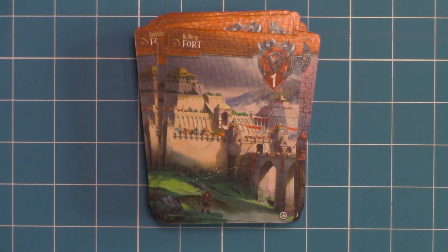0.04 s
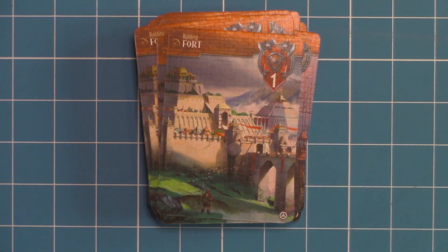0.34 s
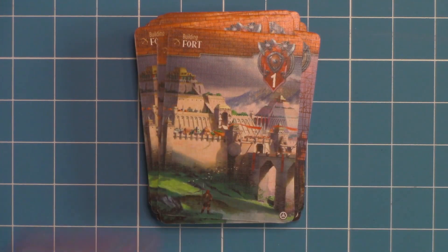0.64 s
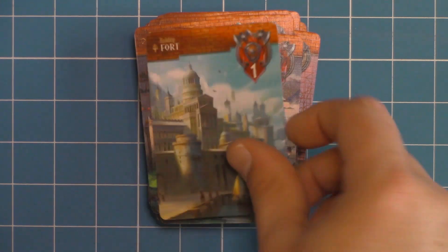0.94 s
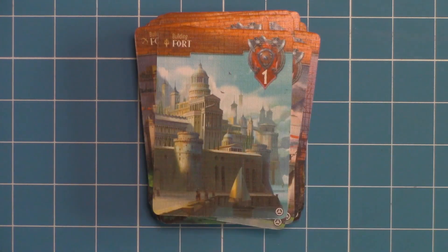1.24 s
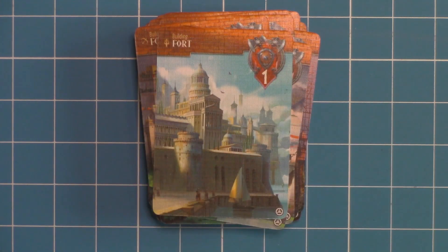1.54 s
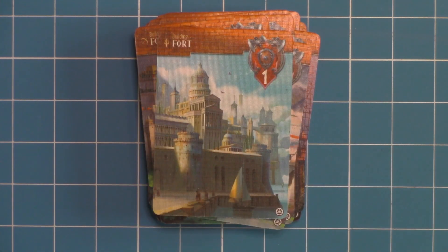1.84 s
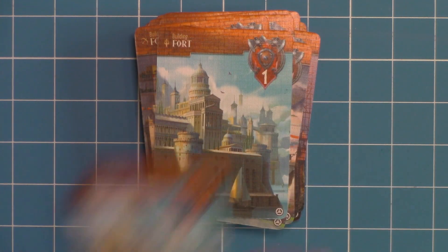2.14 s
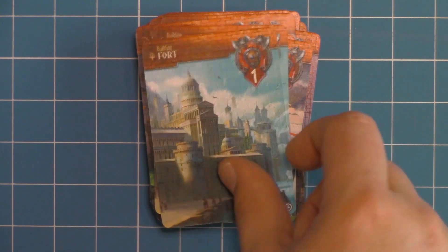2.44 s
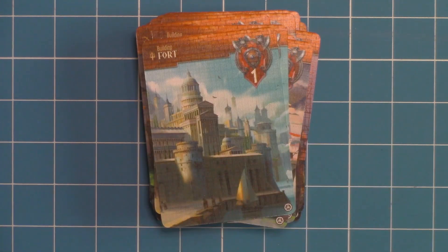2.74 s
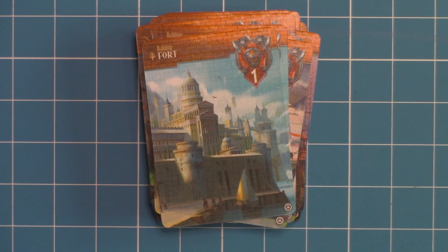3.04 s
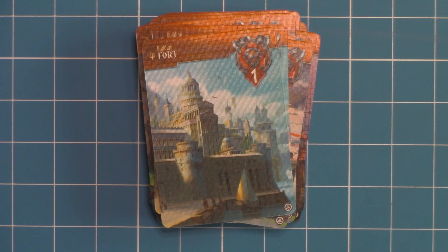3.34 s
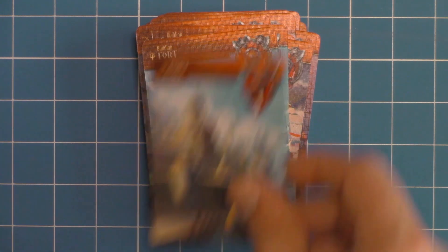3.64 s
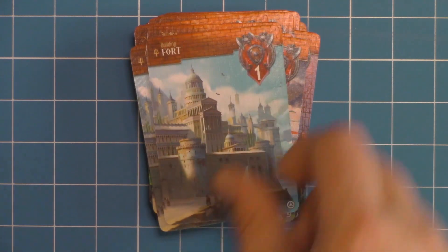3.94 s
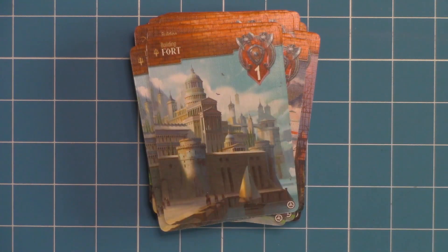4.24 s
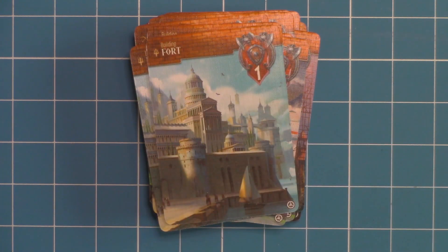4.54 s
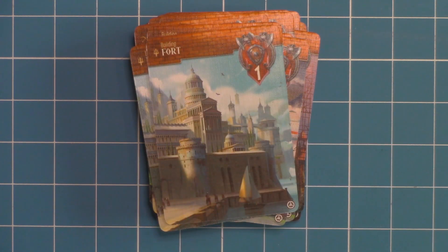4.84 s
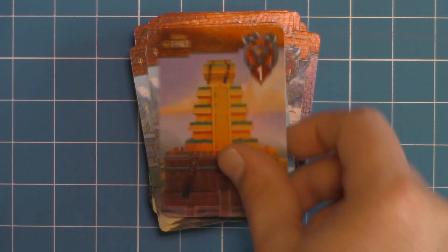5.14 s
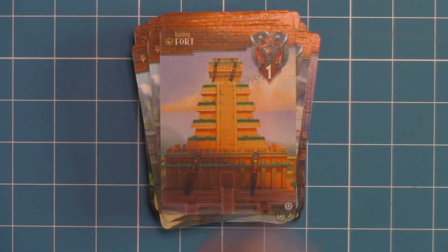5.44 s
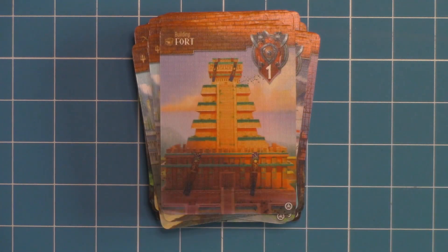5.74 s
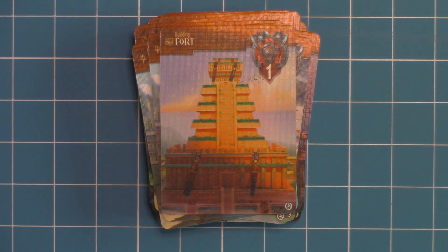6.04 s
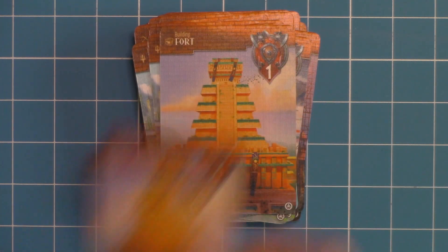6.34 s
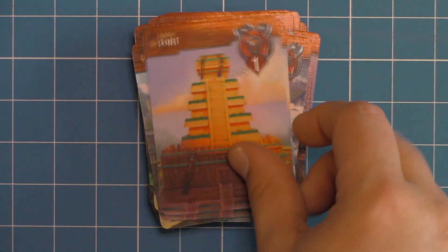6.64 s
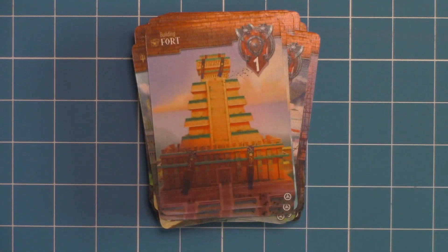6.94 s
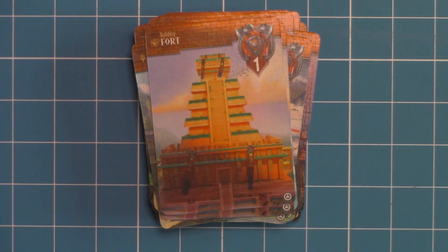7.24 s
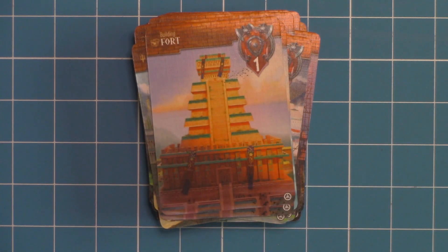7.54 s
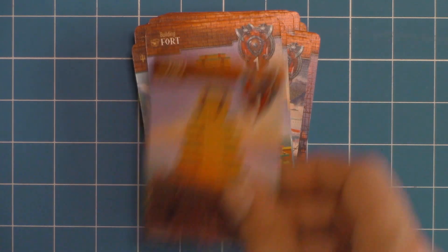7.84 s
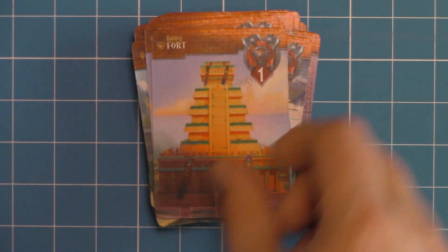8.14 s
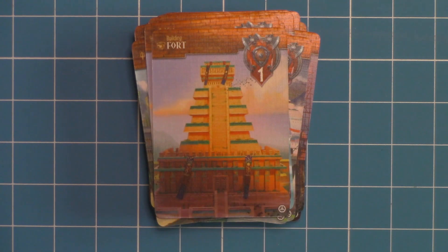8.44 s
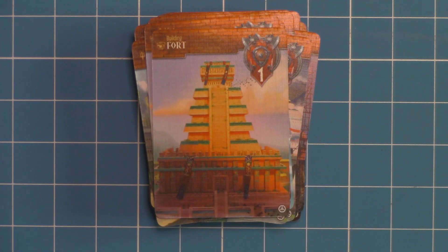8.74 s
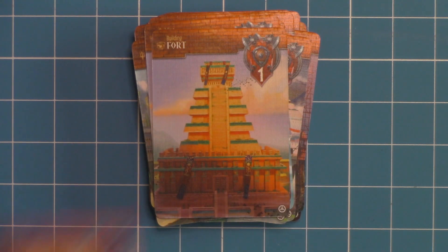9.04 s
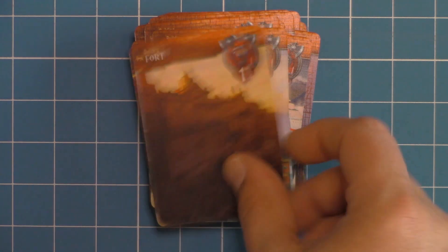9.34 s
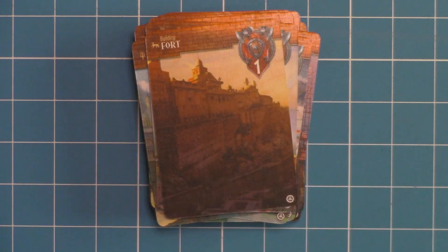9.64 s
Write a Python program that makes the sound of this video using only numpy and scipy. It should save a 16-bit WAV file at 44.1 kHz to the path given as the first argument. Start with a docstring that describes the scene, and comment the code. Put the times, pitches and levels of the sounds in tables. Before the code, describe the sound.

In a small room with a faint rumble and hum, someone deals stiff cards close to the microphone at a steady, unhurried pace. A finger softly brushes the deck, then a card rubs free with a grainy swish, a brief chirp and a crisp snap. It lands on a pile with a tick and a sharp slap that makes the table boom briefly. This happens seven times.

```python
"""Over the faint rumble and hum of a small room, a finger brushes a deck of stiff cards close by.
Seven cards are drawn, one at a time, and laid on a pile on a table. Each rubs off the deck with a swish
and a short rising chirp; all but the last end in a flick of the edge. Each then ticks against the pile,
skims over it and slaps flat under the thumb, which sets the table booming. Walls add a short echo."""
import sys
import numpy as np
from scipy import signal
from scipy.fft import rfft, irfft, next_fast_len
from scipy.io import wavfile
from scipy.ndimage import uniform_filter1d

SR = 44100
rng = np.random.default_rng(int(sys.argv[2]) if len(sys.argv) > 2 else 0)


def to_wav(s):
    """Save 16-bit WAV."""
    ch = np.atleast_2d(s).T  # columns
    pcm = np.round(np.clip(ch, -1, 1) * 32767)  # PCM
    wavfile.write(sys.argv[1], SR, pcm.astype(np.int16))


N = 432180
TIME = np.arange(N) / SR

# Tone colour of light rubbing on a card's face: pitch_hz, level_db
RUB_COLOUR = [(400, -7), (1000, -8), (2100, 3), (3200, -1), (4300, 0.5), (5300, 7), (6400, -4.5),
              (8200, -8.5), (13000, -15), (16000, -29)]
# Tone colour of the fine hiss of card on card: pitch_hz, level_db
HISS_COLOUR = [(5000, -21), (8500, -8), (10500, -1.5), (13000, 0), (14500, -7), (16000, -19)]
# Tone colour of a card edge's tick: pitch_hz, level_db
TICK_COLOUR = [(300, -11), (1000, 1), (2100, 1), (3300, -0.5), (5400, 2.5), (6800, -5.5), (9000, -19),
               (13000, -15), (16000, -38)]
# Each card landing on the pile: slap_s, skim_length_s, skim_db, slap_db, ring_db, ring_hz, hiss_db,
# settle_db, puff_db, thumb_contact_ms (ring_db, hiss_db and settle_db are relative to the slap)
LANDINGS = [(0.9489, 0.14, -57, -21, -6, 5750, -10.5, -26, -58, 3.2),
            (2.3386, 0.13, -51, -17, 3.5, 5950, -11, -26, -54, 2.9),
            (3.7290, 0.11, -52.5, -18.5, -16, 5450, -7, -17.5, -50, 0.53),
            (5.1410, 0.08, -51, -25, -2, 5600, -9, -18, -60, 3.4),
            (6.5747, 0.11, -53, -22, 1, 5860, -14, -24, -40, 2.3),
            (7.978, 0.1, -46.5, -19.5, -3, 5900, -9, -23, -51, 1.27),
            (9.3195, 0.12, -50, -14, 1, 5560, -14, -26, -54, 2.9)]


def from_db(db):
    """Turn decibels into a number to multiply by."""
    return 10 ** (np.asarray(db) / 20)


def rms_one(x):
    """Scale a sound so that its average strength (rms) is 1."""
    return x / np.sqrt(np.mean(x ** 2) + 1e-20)


def at_hz(points, hz, column=1):
    """Read a table at any pitch, sliding between its rows on a musical (log) scale."""
    points = np.array(points)
    return np.interp(np.log(np.maximum(hz, 1)), np.log(points[:, 0]), points[:, column])


def noise(colour):
    """Noise of strength 1 with the given tone colour."""
    size = next_fast_len(N)
    gain = from_db(at_hz(colour, np.fft.rfftfreq(size, 1 / SR)))
    return rms_one(irfft(rfft(rng.standard_normal(size)) * gain, size)[:N])


def flutter(rate_hz, size):
    """A random wobble of strength 1 that changes about rate_hz times a second."""
    steps = np.arange(size) * rate_hz / SR
    return rms_one(np.interp(steps, np.arange(size), rng.standard_normal(size)))


def around(event_s):
    """The samples within a quarter second of an event, and their times counted from it."""
    span = slice(max(round(event_s * SR) - SR // 4, 0), round(event_s * SR) + SR // 4)
    return span, TIME[span] - event_s


def swell(t, rise_s, fall_s, shape):
    """A loudness curve (envelope) with its top at t = 0; shape 1 is a spike, 2 a bell."""
    return np.exp(-np.abs(t / np.where(t < 0, rise_s, fall_s)) ** shape)


def burst(x, envelope):
    """Shape a sound with an envelope and give it that envelope's strength, however short."""
    return rms_one(x * envelope) * np.sqrt(np.mean(envelope ** 2))


def crackle(x, envelope, smooth_bins=301):
    """A very short burst that keeps the broad tone colour of its noise."""
    spectrum = rfft(x * envelope)
    wanted = uniform_filter1d(np.abs(rfft(x)) ** 2, smooth_bins)
    actual = uniform_filter1d(np.abs(spectrum) ** 2, smooth_bins)
    evened = irfft(spectrum * np.sqrt(np.abs(wanted) / (np.abs(actual) + 1e-18)), len(x))
    return rms_one(evened) * np.sqrt(np.mean(envelope ** 2))


def ring(t, hz, fade_s, attack_s):
    """A pure tone struck at t = 0 that dies away by 60 dB in fade_s."""
    age = np.maximum(t, 0)
    return np.sin(2 * np.pi * hz * age) * from_db(-60 * age / fade_s) * (1 - np.exp(-age / attack_s))


def resonate(x, hz, width_hz):
    """Bring out the band of pitches at which a card likes to shake."""
    r = np.exp(-np.pi * width_hz / SR)
    return signal.lfilter([1, 0, -1], [1, -2 * r * np.cos(2 * np.pi * hz / SR), r * r], x)


def background(rumble_db=-52.5, hiss_db=-56.95, waver_radians=0.37):
    """The room's low rumble and soft hiss, with the wavering hum of an appliance."""
    # Tone colours of the rumble and the hiss: pitch_hz, level_db
    rumble_colour = [(11, -47), (18, -9), (48, -6.5), (85, -8.5), (102, -8), (119, 0), (145, -7.5),
                     (242, -7.5), (264, -9.5), (306, -8), (370, -10), (404, -9), (541, -15), (600, -17.5),
                     (780, -29), (1320, -120)]
    air_colour = [(350, -33), (600, -3.5), (768, -4), (869, -2.5), (1160, -6), (1290, -6.5), (1800, -9),
                  (4520, -14), (12500, -19), (16000, -26.5)]
    # Tones of the hum: pitch_hz, level_db
    hum_tones = [(119.5, -61.5), (242, -64)]
    hum = np.zeros(N)
    for hz, db in hum_tones:
        phase = 2 * np.pi * hz * TIME + waver_radians * flutter(7.3, N)
        hum += from_db(db) * np.sqrt(2) * np.sin(phase)
    return from_db(rumble_db) * noise(rumble_colour) + from_db(hiss_db) * noise(air_colour) + hum


def finger_brushes(half_length_s=0.048):
    """Skin whispers over the top card before some of the draws."""
    # Each touch of the finger: peak_s, level_db
    touches = [(0.293, -63), (1.55, -61.5), (2.915, -62), (3.02, -62), (4.44, -59.5), (7.156, -66)]
    out, rub = np.zeros(N), noise(RUB_COLOUR)
    for peak_s, db in touches:
        span, t = around(peak_s)
        out[span] += from_db(db) * swell(t, half_length_s, half_length_s, shape=2.1) * rub[span]
    return out


def draw_swishes(hiss_db=-6.5, rasp_db=-2, rasp_lag_s=0.0027, fall_share=0.82, shape=1.63):
    """Card rubs on card: a grainy swish follows the hand, with a lower rasp as the card overhangs."""
    # Each pull, loudest at the hand's top speed: peak_s, level_db, rise_s, extra_rasp_db
    pulls = [(0.486, -38.5, 0.054, 1), (1.911, -44.5, 0.057, -0.5), (3.297, -41.5, 0.051, 1.5),
             (4.683, -39, 0.047, -3), (6.099, -46, 0.054, 1), (7.516, -36.5, 0.043, -6),
             (8.861, -37, 0.043, -6.5)]
    # Tone colours of the swish and the rasp: pitch_hz, level_db
    swish_colour = [(1500, -20), (2500, -9), (3500, -16.5), (4600, -1), (5800, -2), (7000, -5), (8200, -14),
                    (12000, -15), (16000, -42)]
    rasp_colour = [(400, -41), (800, 1.5), (1200, 5), (1700, -5), (2400, -2), (3400, 0.5), (5000, -6),
                   (9000, -30)]
    out, swish, hiss, rasp = np.zeros(N), noise(swish_colour), noise(HISS_COLOUR), noise(rasp_colour)
    for peak_s, db, rise_s, extra_rasp_db in pulls:
        span, t = around(peak_s)
        fall_s = fall_share * rise_s
        # A raspier card also hisses more.
        bright = swish[span] + from_db(hiss_db + 0.5 * extra_rasp_db) * hiss[span]
        low = from_db(rasp_db + extra_rasp_db) * rasp[span]
        out[span] += from_db(db) * swell(t, rise_s, fall_s, shape) * bright
        out[span] += from_db(db) * swell(t - rasp_lag_s, rise_s, fall_s, shape) * low
    grain_db = 2.5 * np.minimum(flutter(2500, N), 2)
    unsteady_db = 1.7 * np.minimum(flutter(200, N), 2)
    return out * from_db(grain_db + unsteady_db)


def chirps(octaves_per_s=14, jitter=0.036, rough_db=5.0, octave_db=-13):
    """The card sticks and slips, singing a rough tone that climbs as less of it lies on the deck."""
    # One chirp in each pull: peak_s, level_db, rise_s, pitch_hz
    squeaks = [(0.497, -43, 0.025, 1160), (1.935, -39, 0.01, 1130), (3.316, -32, 0.015, 1180),
               (4.698, -39, 0.026, 1110), (6.124, -36, 0.025, 1310), (7.530, -32, 0.0094, 1040),
               (8.884, -38, 0.021, 1120)]
    out = np.zeros(N)
    for peak_s, db, rise_s, hz in squeaks:
        span, t = around(peak_s)
        climb = 2 ** (octaves_per_s * np.clip(t, -0.04, 0.03))
        pitch_hz = hz * climb * (1 + jitter * flutter(700, len(t)))
        phase = 2 * np.pi * np.cumsum(pitch_hz) / SR
        tone = np.sin(phase) + from_db(octave_db) * np.sin(2 * phase)
        tone *= from_db(rough_db * flutter(350, len(t)))
        out[span] += from_db(db) * burst(tone, swell(t, rise_s, fall_s=0.0094, shape=1.54))
    return out


def edge_flicks(attack_s=0.0015, boost_db=3, buzz_db=1.0, crack_db=-31, sag=0.16, relax_s=0.0015):
    """The freed edge cracks and buzzes briefly, sinking in pitch as its bend relaxes."""
    # The first six cards spring off the deck: start_s, level_db (before boost_db), pitch_hz, fade_s
    releases = [(0.5220, -9, 2450, 0.011), (1.968, -12, 2770, 0.0053), (3.3481, -18, 2580, 0.0091),
                (4.7370, -11, 2620, 0.014), (6.1510, -24, 2680, 0.015), (7.5721, -17.5, 2440, 0.017)]
    out, crack = np.zeros(N), noise(TICK_COLOUR)
    for start_s, db, hz, fade_s in releases:
        span, t = around(start_s)
        # A clock that runs fast at first makes the tone start high; its wobble roughens the pitch.
        clock = t + sag * relax_s * (1 - np.exp(-np.maximum(t, 0) / relax_s))
        clock += 0.02 * flutter(800, len(t)) / 800
        tones = [(hz, 0), (1.99 * hz, -9), (2.99 * hz, -20)]   # pitch_hz, level_db
        buzz = sum(from_db(level) * ring(clock, pitch, fade_s, attack_s) for pitch, level in tones)
        out[span] += from_db(db + boost_db + buzz_db * flutter(2500, len(t))) * buzz
        spike = swell(t - attack_s, rise_s=0.0015, fall_s=0.0011, shape=0.54)
        out[span] += from_db(crack_db) * crackle(crack[span], spike)
    return out


def edge_taps(width_hz=750):
    """An edge meets the cards with a dry tick, coloured by how the card is held."""
    # Each tick: peak_s, level_db, ring_db (relative to the tick), ring_hz
    hits = [(0.8077, -35.5, -1, 2200), (0.8310, -37, -13, 4400), (2.218, -27, -6, 5300),
            (3.6330, -35, 4, 1800), (5.0520, -29, -4, 4670), (5.115, -27.5, 6, 2200),
            (6.075, -32.5, 8, 5300), (6.4647, -17.5, 4, 4550), (7.867, -23.5, -7, 4900),
            (7.8714, -32, -5, 5500), (7.9271, -27.5, 0, 2400), (8.765, -44, -6, 2400),
            (9.1907, -34.5, 2, 1700)]
    out, tick = np.zeros(N), noise(TICK_COLOUR)
    for peak_s, db, ring_db, ring_hz in hits:
        span, t = around(peak_s)
        card = rms_one(resonate(rng.standard_normal(len(t)), ring_hz, width_hz))
        spike = swell(t, rise_s=0.0004, fall_s=0.0024, shape=0.8)
        out[span] += from_db(db) * crackle(tick[span] + from_db(ring_db) * card, spike)
    return out


def skims(grain_db=3.0, ramp_s=0.008):
    """A lightly held card scratches across the pile until it lies flat, scuffing where it catches."""
    # Each catch of the sliding card: peak_s, level_db
    scuffs = [(0.850, -47.5), (2.330, -36), (3.668, -37), (5.108, -42), (6.490, -39), (7.924, -42),
              (9.224, -38)]
    pressure = np.zeros(N)
    rub = rms_one(noise(RUB_COLOUR) * from_db(grain_db * flutter(1300, N)))
    for slap_s, length_s, db, *_ in LANDINGS:
        span, t = around(slap_s)
        pressure[span] += from_db(db) * np.clip(np.minimum(t + length_s, -t) / ramp_s, 0, 1)
    for peak_s, db in scuffs:
        span, t = around(peak_s)
        scuff = from_db(db) * swell(t, rise_s=0.011, fall_s=0.013, shape=1.5)
        pressure[span] = np.hypot(pressure[span], scuff)
    return pressure * rub


def fanned_air(top_hz=6400, octaves_per_s=3.2, width_hz=900, hiss_db=-50, ahead_s=0.0034):
    """A sinking card pushes out a low puff of air; the narrowing gap gives a hiss that climbs."""
    # Tone colour of the puff: pitch_hz, level_db
    puff_colour = [(20, -8), (45, -7), (75, 9), (130, -24), (300, -28), (1000, -60)]
    out, air = np.zeros(N), noise(puff_colour)
    for slap_s, *_, puff_db, _ in LANDINGS:
        span, t = around(slap_s - ahead_s)
        pitch_hz = top_hz * 2 ** (octaves_per_s * np.minimum(t, 0))
        phase = 2 * np.pi * np.cumsum(pitch_hz) / SR
        hiss = flutter(width_hz, len(t)) * np.sin(phase) + flutter(width_hz, len(t)) * np.cos(phase)
        out[span] += from_db(hiss_db) * swell(t, rise_s=0.026, fall_s=0.01, shape=0.91) * hiss
        puff = swell(t + 0.022, rise_s=0.037, fall_s=0.025, shape=1.3)   # peaks before the hiss
        out[span] += from_db(puff_db) * burst(air[span], puff)
    return out


def slaps(width_hz=420, upper_ratio=1.215, upper_db=-5, grain_db=3.5, pop_db=-24, settle_s=0.034):
    """The bowed card flattens in a rush of tiny contacts, rings, pops out the air below and settles."""
    # Tone colours of the slap and the popping air: pitch_hz, level_db
    slap_colour = [(500, -43), (1500, 1), (2200, -1), (3100, 7.5), (4500, 3.5), (7000, 1.5), (8500, -10),
                   (16000, -48)]
    pop_colour = [(100, -3), (330, -17), (520, -2), (1000, 5), (1500, -6), (2100, 5.5), (3000, -7.5),
                  (5000, -16)]
    out, clap, hiss, pop = np.zeros(N), noise(slap_colour), noise(HISS_COLOUR), noise(pop_colour)
    for slap_s, _, _, db, ring_db, ring_hz, hiss_db, settle_db, *_ in LANDINGS:
        span, t = around(slap_s)
        close_s = 0.002 * 2 ** ((-19 - db) / 13)   # a slap 13 dB harder closes in half the time
        closing = swell(t, close_s, close_s, shape=1)
        settling = from_db(settle_db) * swell(t, close_s, settle_s, shape=1.03)
        contacts = burst(from_db(grain_db * flutter(3000, len(t))), closing + settling)
        lower = resonate(rng.standard_normal(len(t)), ring_hz, width_hz)
        upper = resonate(rng.standard_normal(len(t)), upper_ratio * ring_hz, width_hz)
        card = rms_one(lower + from_db(upper_db) * upper)
        blend = clap[span] + from_db(ring_db) * card + from_db(hiss_db) * hiss[span]
        blend += from_db(pop_db - db) * pop[span]   # about equally loud however hard the slap
        out[span] += from_db(db) * crackle(blend, contacts)
    return out


def smacks(lag_s=0.00094):
    """The last bit of the gap shuts with one sharp smack, louder for a shorter, harder contact."""
    # Tone colour of the smack: pitch_hz, level_db
    smack_colour = [(200, 19), (1500, -1), (6000, -3), (12000, 15), (16000, -38)]
    out, click = np.zeros(N), noise(smack_colour)
    for slap_s, *_, contact_ms in LANDINGS:
        span, t = around(slap_s + lag_s)
        spike = swell(t, rise_s=0.0001, fall_s=0.0001, shape=3.4)
        out[span] += from_db(-17) / contact_ms * burst(click[span], spike)
    return out


def table_booms(push_db=0.9, spread_db=1.3, knock_db=-23.5, attack_s=0.0025, lag_s=0.00092):
    """The thumb knocks the pile and rings the table; a longer, softer push gives weaker high tones."""
    # The table's own tones: pitch_hz, level_db (before push and softness), fade_s
    table_tones = [(69.6, -32, 0.59), (79.6, -39, 0.67), (110, -39.5, 0.19), (177, -43, 0.23),
                   (213, -37.5, 0.22), (247, -43.5, 0.33), (302.6, -28, 0.22), (332, -32, 0.28),
                   (349, -37, 0.1), (396, -26.5, 0.26), (483, -41.5, 0.19), (518, -42, 0.32),
                   (616, -45, 0.32), (706, -35, 0.12)]
    out = np.zeros(N)
    for slap_s, *_, contact_ms in LANDINGS:
        span = slice(round(slap_s * SR), round(slap_s * SR) + SR // 2)
        t = TIME[span] - slap_s - lag_s
        for k, (hz, db, fade_s) in enumerate(table_tones):
            softness = 1 + (hz * contact_ms / 1000) ** 3
            strength = from_db(db - spread_db * rng.standard_normal()) / softness
            out[span] -= (-1) ** k * strength * ring(t, hz, fade_s, attack_s)   # down and up in turn
        out[span] += from_db(knock_db) * ring(t, hz=269, fade_s=0.027, attack_s=attack_s)
    return from_db(push_db) * out


def room_echo(x, build_s=0.0058):
    """Sound bounces off nearby walls, each band of pitches dying away at its own speed."""
    # The walls' echo: pitch_hz, level_db, fade_s
    walls = [(503, -5.5, 0.38), (1210, -10, 0.3), (2680, -10, 0.22), (5600, -10.5, 0.36),
             (9000, -11.5, 0.17), (14000, -16, 0.24)]
    t = TIME[:SR // 2]
    white, echo = rng.standard_normal((2, len(t))), 0
    edges_hz = np.geomspace(350, 18000, 12)
    for k, (low, high) in enumerate(zip(edges_hz, edges_hz[1:])):
        hz = np.sqrt(low * high)
        decay = from_db(-60 * t / at_hz(walls, hz, column=2)) * (1 - np.exp(-(t / build_s) ** 2))
        band = signal.sosfilt(signal.butter(2, [low, high], "band", fs=SR, output="sos"), white[k % 2])
        echo += from_db(at_hz(walls, hz)) * band * decay / np.sqrt(np.sum(decay ** 2))
    return signal.fftconvolve(x, echo)[:N]


def scene(self_noise_db=-63):
    """Both channels hear the same cards and room; each adds a faint noise of its own."""
    # Tone colour of each channel's own noise: pitch_hz, level_db
    self_noise_colour = [(20, 2), (70, 0), (200, -3), (400, -0.5), (1200, -5), (6000, -6), (12000, -8.5),
                         (16000, -8.5)]
    rubs = draw_swishes() + skims() + fanned_air() + finger_brushes()
    claps = slaps() + smacks()
    squeaks, flicks, ticks = chirps(), edge_flicks(), edge_taps()
    echoes = room_echo(from_db(-1) * (rubs + flicks) + from_db(-3) * squeaks + ticks + claps)
    sound = rubs + squeaks + flicks + ticks + claps + table_booms() + echoes + background()
    return np.array([sound + from_db(self_noise_db) * noise(self_noise_colour) for _ in range(2)])


def record(dry, cutoff_hz=16000):
    """A steep filter cuts off the very highest treble."""
    return signal.sosfilt(signal.ellip(10, 0.1, 80, cutoff_hz, fs=SR, output="sos"), dry)


dry = scene()
out = record(dry)
to_wav(out)
```